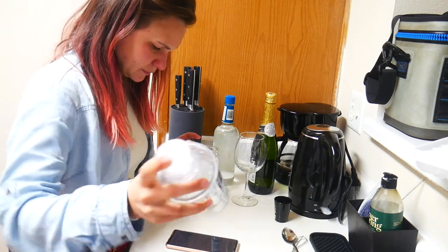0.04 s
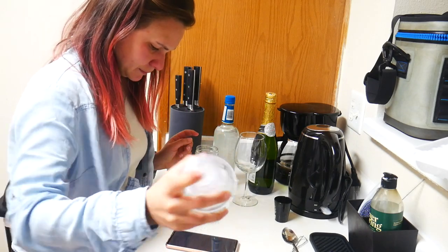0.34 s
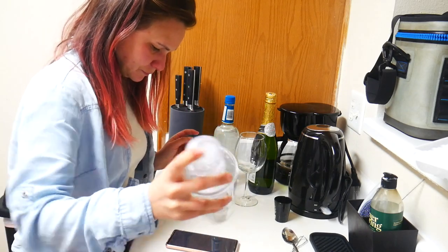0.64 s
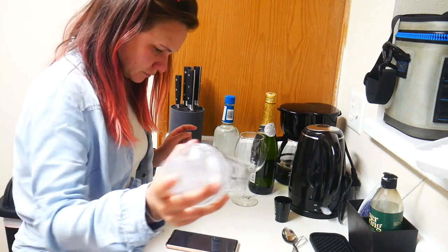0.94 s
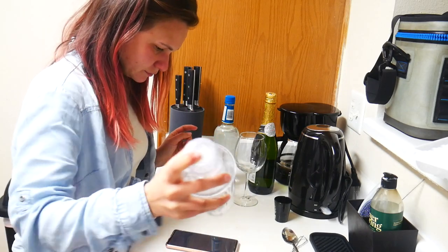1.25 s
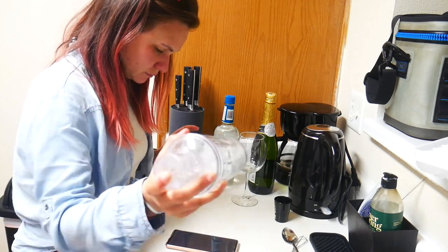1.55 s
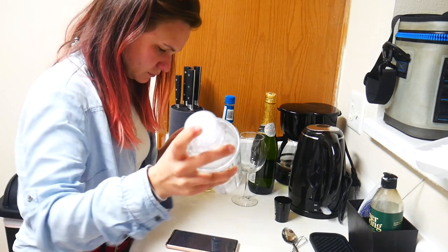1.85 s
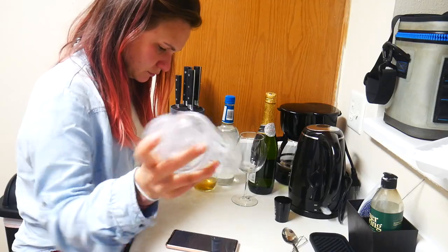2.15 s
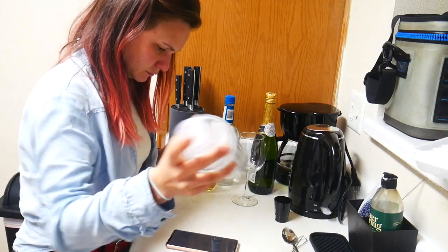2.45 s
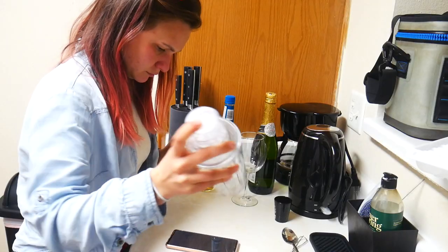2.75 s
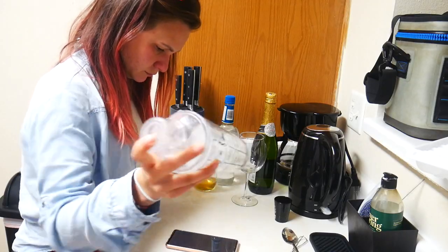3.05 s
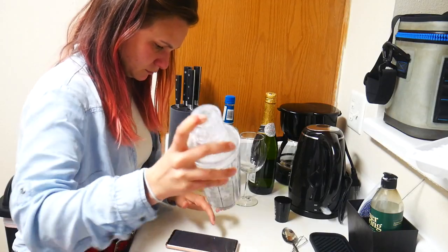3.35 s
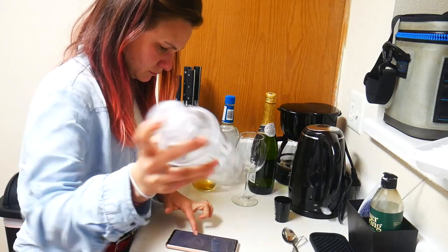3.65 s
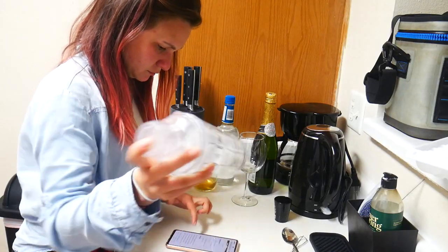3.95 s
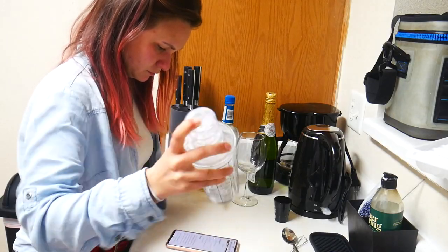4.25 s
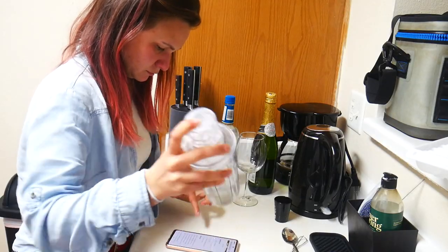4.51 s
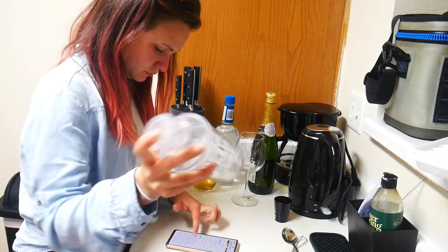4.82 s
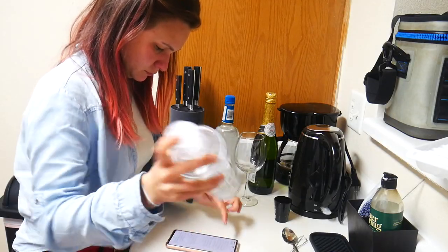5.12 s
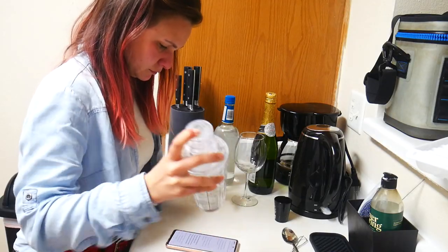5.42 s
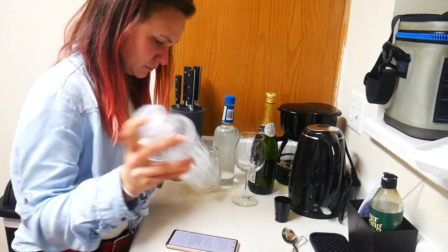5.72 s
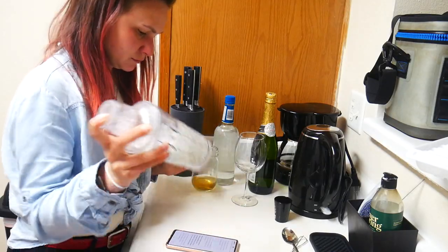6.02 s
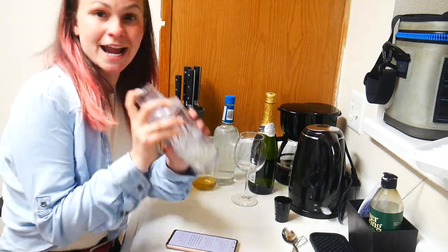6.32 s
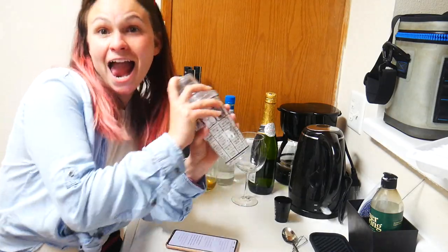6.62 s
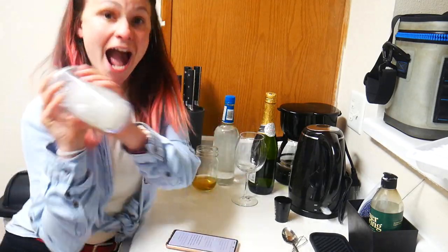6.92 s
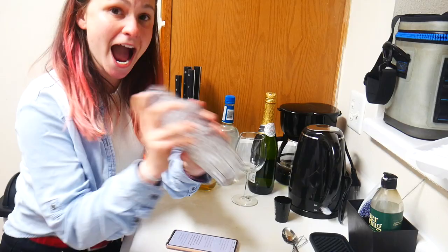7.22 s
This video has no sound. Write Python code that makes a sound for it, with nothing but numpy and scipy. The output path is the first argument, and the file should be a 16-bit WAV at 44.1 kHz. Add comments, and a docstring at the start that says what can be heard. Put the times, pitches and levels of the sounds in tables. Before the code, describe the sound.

Ice and liquid are shaken hard in a metal cocktail shaker, a fast, even rattle that loosens near the end.

```python
"""Ice and liquid are shaken hard in a metal cocktail shaker in a small kitchen, about 4.6 strokes a second.
The first strokes land heavily, until froth builds up. Each slams the load into one end and spills it back
more softly: collisions, clinks and bubbles excite the shaker's resonances, with single cubes standing out.
The shaker keeps moving, so successive blows meet different echoes. After about six seconds the rhythm
breaks into a loose rattle and some slower swings."""
import sys
import numpy as np
from scipy import signal
from scipy.fft import rfft, irfft
from scipy.io import wavfile

SR = 44100
rng = np.random.default_rng(int(sys.argv[2]) if len(sys.argv) > 2 else 0)


def wav_record(signal):
    """Record a signal, one row per channel, as 16-bit PCM in the file named by sys.argv[1]."""
    frames = np.transpose(np.atleast_2d(signal))
    bounded = np.clip(frames, -1, 1)
    # unit amplitude maps onto the largest positive 16-bit level
    quanta = np.round(bounded * 32767).astype(np.int16)
    wavfile.write(sys.argv[1], SR, quanta)


N = 325008
SIZE = 8192   # samples in one blow or impulse response
HZ = np.maximum(np.arange(SIZE // 2 + 1) * SR / SIZE, 1)
AGE = np.arange(SIZE) / SR   # seconds since a blow began


def from_db(db):
    """Amplitude ratio of a level in decibels."""
    return 10 ** (np.asarray(db) / 20)


def unit(x):
    """Normalisation to an energy of one."""
    return x / np.sqrt(np.sum(x ** 2) + 1e-20)


def at_hz(points):
    """Interpolation of a table on a log-frequency axis."""
    hz, value = np.transpose(points)
    return np.interp(np.log(HZ), np.log(hz), value)


def through(x, curve_db):
    """Minimum-phase filtering: folding the cepstrum makes a gain curve causal."""
    cepstrum = irfft(np.log(from_db(curve_db)))
    cepstrum[1:SIZE // 2] *= 2
    cepstrum[SIZE // 2 + 1:] = 0
    response = irfft(np.exp(rfft(cepstrum)))
    return signal.fftconvolve(x, response)[:len(x)]


def add(track, start_s, sound):
    """Superposition of a sound on a track."""
    start = max(0, round(start_s * SR))
    track[start:start + len(sound)] += sound[:N - start]


def collisions(per_s, spread_db, size):
    """Poisson process: random clicks of either sign, many small and a few large."""
    heights = from_db(spread_db * np.minimum(rng.exponential(1, size), 3.5))
    hits = rng.random(size) < per_s / SR
    return hits * heights * rng.choice([-1, 1], size)


def tilt(bass_db, treble_db, bass_edge_hz=1040, treble_edge_hz=4500):
    """Contact hardness, as a dB curve: cushioned blows carry bass, bare ice splinters in the treble."""
    bass_shelf = 1 / (1 + (HZ / bass_edge_hz) ** 4)
    treble_slope = .62 * np.sqrt(np.log(1 + (HZ / treble_edge_hz) ** 4))
    return bass_db * bass_shelf + treble_db * treble_slope


# Spectrum of the steady background: frequency_hz, relative_level_db
ROOM_SPECTRUM = [(25, 10), (120, 3), (400, -2), (2000, -30), (15000, -40)]

def room_tone(level_db=-77):
    """Stationary noise: a faint rumble, uncorrelated between left and right."""
    rumble = [unit(through(noise, at_hz(ROOM_SPECTRUM))) for noise in rng.standard_normal((2, N))]
    return from_db(level_db) * np.sqrt(N) * np.array(rumble)


# Reverberation time of the kitchen: frequency_hz, t60_s
KITCHEN_DECAY = [(150, 0.44), (500, 0.2), (1200, 0.52), (3000, 0.31), (7000, 0.39), (15000, 0.2)]

def echoes(early_db, tail_db, build_s=0.0041, count=10):
    """Room impulse response: reflections off counter, wall and cupboards, then a diffuse tail."""
    early = np.zeros(SIZE)
    early[(rng.uniform(.001, .012, count) * SR).astype(int)] = rng.standard_normal(count)
    spectrum, tail = rfft(rng.standard_normal(SIZE)), 0
    centres_hz, t60s = np.transpose(KITCHEN_DECAY)
    for band, t60_s in zip(np.eye(len(t60s)), t60s):
        band_noise = irfft(spectrum * np.interp(np.log(HZ), np.log(centres_hz), band))
        tail = tail + band_noise * from_db(-60 * AGE / t60_s)
    build_up = 1 - np.exp(-AGE / build_s)
    return from_db(early_db) * unit(early) + from_db(tail_db) * unit(tail * build_up)


def kitchen(blows, positions=40):
    """Reflections depend on source position: each (start_s, sound) takes the next set of echoes."""
    responses = [(echoes(early_db=-11, tail_db=-7), echoes(early_db=-4, tail_db=-4))
                 for _ in range(positions)]
    direct, ahead, around = np.zeros((3, N))
    for k, (start_s, sound) in enumerate(blows):
        add(direct, start_s, sound)
        for track, response in zip((ahead, around), responses[k % positions]):
            add(track, start_s, signal.fftconvolve(sound, response))
    return direct, ahead, around


# Stereo width by frequency: frequency_hz, side_gain_db
STEREO_WIDTH = [(60, -1), (200, -11), (700, -10), (2700, -10.5), (4000, -21), (6800, -22), (8500, -7.5),
                (15000, -6.5)]

def stereo_width(sound):
    """Side-channel gain sets the stereo width: nearly mono from 4 to 7 kHz."""
    return through(sound, at_hz(STEREO_WIDTH))


# Radiation of the filled shaker: frequency_hz, relative_level_db
RADIATION = [(30, -34), (90, -29), (140, -13.5), (330, -7), (520, -5), (1100, -1.32), (2400, 0.2),
             (4000, -2), (5100, -5), (7400, -6), (8400, -8.5), (10500, -9), (13000, -15), (16000, -28)]
# Resonances of the cavity and wall: centre_hz, width_hz, lift_db
SHAKER_MODES = [(152.5, 21, 3), (239, 20, 4.5), (506, 220, 4), (634, 73, 3.5), (892, 150, 4.5),
                (1150, 95, 2.5), (1363, 18, 7.5), (1541, 47, 3.5), (2830, 196, 4), (3490, 84, 3.5),
                (5780, 710, 2.5), (9830, 1600, 2)]

def shaker_body():
    """Modal response, as a dB curve: Lorentzian peaks on a broad radiation spectrum."""
    peaks_db = sum(lift_db / (1 + (2 * (HZ - centre_hz) / width_hz) ** 2)
                   for centre_hz, width_hz, lift_db in SHAKER_MODES)
    return at_hz(RADIATION) + peaks_db


# Loose ice and liquid between the surges: time_s, level_db
SWILL_LEVELS = [(0, -29.5), (1.2, -37), (6.0, -38.5), (6.4, -42), (6.95, -42), (7.1, -30.5), (7.37, -35.5)]

def swill(body):
    """Shot noise: dense, tiny impacts of loose cubes and froth in mid-flight merge into a rustle."""
    ticks = collisions(per_s=5000, spread_db=1.5, size=N)
    rustle = through(ticks, body + tilt(bass_db=-2, treble_db=-5))
    level_db = np.interp(np.arange(N) / SR, *np.transpose(SWILL_LEVELS))
    return np.sqrt(N) * unit(rustle) * from_db(level_db)


def chips(direct, body, share_db=-5.5, settle_s=0.016):
    """Relaxation: each blow scatters chips and froth, which crackle on as its energy leaks away."""
    retained = np.exp(-1 / (settle_s * SR))
    agitation = signal.lfilter([1 - retained], [1, -retained], direct ** 2 + 1e-18)
    ticks = collisions(per_s=5000, spread_db=4, size=N)
    crackle = through(ticks, body + tilt(bass_db=-2.5, treble_db=-2.5))
    return from_db(share_db) * np.sqrt(N * agitation) * unit(crackle)


def clack(pitch_hz, lift_db, ripple_db, width_octaves=.14, points=50):
    """Selective excitation, as a dB curve: one resonance stands out, the load damps others at random."""
    ripple = np.transpose([np.geomspace(150, 16000, points), rng.normal(0, ripple_db, points)])
    peak = np.exp(-.5 * (np.log2(HZ / pitch_hz) / width_octaves) ** 2)
    return lift_db * peak + at_hz(ripple)


def clatter(lift_db, centre_hz=2400, width_octaves=0.98):
    """Band emphasis, as a dB curve: the more ice lands ahead of the liquid, the stronger the middle."""
    return lift_db / (1 + (np.log2(HZ / centre_hz) / width_octaves) ** 4)


def fresh_bass(start_s, lift_db=2, froth_s=0.27):
    """Cushioning: fresh liquid lands with extra bass, in dB, which dies away as froth builds up."""
    return lift_db * np.exp(-start_s / froth_s)


def rings(starts, low_hz, high_hz, cycles, glide, size=2048):
    """Damped oscillators of random pitch: over `cycles` they fall 60 dB and rise by the fraction `glide`."""
    out, age = np.zeros(SIZE + size), AGE[:size]
    for start in starts:
        pitch_hz = low_hz * (high_hz / low_hz) ** rng.random()
        life = age * pitch_hz / cycles
        phase = 2 * np.pi * pitch_hz * age * (1 + glide * life / 2)
        out[start:start + size] += rng.normal() * from_db(-60 * life) * np.cos(phase)
    return unit(out[:SIZE])


def push(rise_s, fall_s, first_touch=0):
    """Contact force of the load: a share arrives at once, the rest piles up, then it settles."""
    piled = np.minimum(AGE / max(rise_s, 1 / SR), 1)
    settling = np.exp(-np.maximum(AGE - rise_s, 0) / fall_s)
    return (first_touch + (1 - first_touch) * piled) * settling


def surge(force, body, low_hz, high_hz, clack_db, spread_db):
    """Common excitation: one force drives crackling ice, clinking cubes and ringing air bubbles."""
    clink_starts, bubble_starts = rng.choice(SIZE, (2, 12), p=force ** 2 / np.sum(force ** 2))
    clack_hz = low_hz * (high_hz / low_hz) ** rng.random()
    impacts = force * collisions(per_s=3600, spread_db=spread_db, size=SIZE)
    crackle = through(impacts, body + clack(clack_hz, clack_db, ripple_db=1.5))
    clinks = from_db(-12) * rings(clink_starts, low_hz=1190, high_hz=4180, cycles=41, glide=0)
    bubbles = from_db(-17) * rings(bubble_starts, low_hz=466, high_hz=1480, cycles=14.5, glide=0.09)
    return np.linalg.norm(force) * unit(unit(crackle) + clinks + bubbles)


def cube(body, clack_hz, clack_db, crunch_db=5, crunch_s=0.0013):
    """Brittle impact: one impulse and a brief crunch as the cube's edge crumbles."""
    contact = from_db(crunch_db) * unit(rng.standard_normal(SIZE) * np.exp(-AGE / crunch_s))
    contact[0] += rng.choice([-1, 1])
    return unit(through(contact, body + clack(clack_hz, clack_db, ripple_db=1.8)))


# Single cubes hitting the wall or cap: start_s, level_db, bass_db, treble_db, pitch_hz
CUBE_KNOCKS = [(0.145, -18, 7, 13, 3460), (0.151, -6.5, 6, -7, 3460), (0.327, -12, -2, -9, 2500),
               (0.355, -6.5, -11, -1, 3400), (0.359, -8.0, 8, -2, 3450), (0.568, -9, 0, -7, 3260),
               (0.584, -11.5, 12, -8, 550), (0.666, -17.5, 3, 1, 2780), (0.784, -10, 11, -18, 780),
               (0.791, -3.5, 4.5, -14, 814), (0.887, -12, 7, -1, 1620), (0.99, -7, -4, 0, 3340),
               (0.995, -14.0, 11.5, -2, 3310), (1.085, -5.5, -3, -7, 2740), (1.28, -7, -8, -11, 2220),
               (1.297, -10.5, -13, 2, 2240), (1.406, -20.5, 16.5, 14.5, 940), (1.612, -13, 5, 3, 810),
               (1.706, -12, -9, 7.5, 3670), (1.819, -20.5, 12, 12, 2770), (2.036, -25, 16, 18, 500),
               (2.056, -12, -6, 1, 1650), (2.244, -7, 1.5, -6, 3440), (2.343, -15, 0, -1, 1480),
               (2.461, -7.5, -3.5, -7, 3620), (2.673, -10, 3, -4, 3460), (2.75, -11.0, -6, 2, 4190),
               (2.878, -15.5, -11, -8, 3040), (2.902, -13, 8, 4, 1010), (3.312, -19.5, 11.5, 11, 550),
               (3.406, -16, -3, 10, 1770), (3.517, -17.5, -11.5, -8, 1210), (3.55, -19.5, 2, 10, 1840),
               (3.555, -13, -9.5, -2, 3540), (3.567, -9.5, -19, -11, 1660), (3.775, -8, 4, 1, 790),
               (4.082, -9, -7, -5, 1670), (4.21, -11.5, 10, -12, 3280), (4.302, -16, -2, 1, 1530),
               (4.67, -8.5, 5.5, 0, 3100), (4.772, -5.5, -7, -6, 2320), (4.777, -9.5, -6.5, 3, 2380),
               (4.915, -25, 0, 17.5, 3360), (5.008, -13.5, 0, -3, 1540), (5.164, -11, 0, -1, 1160),
               (5.242, -12.5, 7, 0, 1280), (5.378, -20, 0.5, 13, 1230), (5.475, -9, 0, -4, 2320),
               (5.598, -20, 6, 6, 1270), (5.698, -7, -7.5, -8, 2740), (5.909, -12, -4, -8, 2620),
               (5.934, -11, -2, -16, 2810), (6.054, -16.5, -9, 6.5, 1220), (6.085, -9, -9, -9, 2890),
               (6.297, -17.5, 1.5, -14, 1710), (6.338, -22, 0, -19, 2300), (6.366, -21.5, 1, -22, 2300),
               (6.442, -7, -6.5, -3.5, 2450), (6.624, -17, 11, 2, 2540), (6.702, -6, -8, -5, 2070),
               (6.853, -7, -16, -14, 2150), (6.981, -8.5, 2.5, -6, 1410), (6.995, -11.5, -2, -6, 3900)]

def knocks(body, gain_db=0.68, ring_db=9.5, loss_per_bass_db=0.44):
    """Liquid damping: a bare cube rings on the metal; one with liquid behind it gives a heavy knock."""
    millisecond_scale = np.sqrt(SR / 1000)   # unit energy becomes unit power over one millisecond
    for start_s, level_db, bass_db, treble_db, pitch_hz in CUBE_KNOCKS:
        contact = cube(body, pitch_hz, clack_db=ring_db - loss_per_bass_db * bass_db)
        knock = through(contact, tilt(bass_db, treble_db))
        yield start_s, from_db(level_db + gain_db) * millisecond_scale * knock


# The load tumbling once the rhythm breaks: start_s, rise_s, level_db, clatter_db
LOOSE_TUMBLES = [(6.148, 0.049, -20.5, -1), (6.426, 0.021, -22, 0.5), (6.476, 0.014, -17.5, -5),
                 (6.515, 0.019, -24, 0.5), (6.558, 0.037, -22.5, -1.5), (6.616, 0.0037, -17.5, -1),
                 (6.668, 0.0031, -22, -1.5), (6.7, 0.0008, -22.0, 1), (6.743, 0.043, -21, -0.5),
                 (6.823, 0.038, -25, 3.5), (7.148, 0.047, -17, 1.5), (7.272, 0.024, -25.5, 5.5)]

def tumbles(body, gain_db=0.44):
    """Wall resonance: without a hard swing the cubes drop on the side, which answers near one pitch."""
    for start_s, rise_s, level_db, clatter_db in LOOSE_TUMBLES:
        force = push(rise_s, fall_s=0.021)
        rattle = surge(force, body, low_hz=1880, high_hz=2380, clack_db=5, spread_db=4)
        colour = tilt(bass_db=-2, treble_db=-1.6) + clatter(clatter_db)
        yield start_s, from_db(level_db + gain_db) * through(rattle, colour)


# The load spilling back between slams: start_s, rise_s, level_db, clatter_db
RETURN_SPILLS = [(0.203, 0.037, -19, 3.5), (0.428, 0.029, -17.5, -1.5), (0.638, 0.015, -14.5, -2.5),
                 (0.858, 0.027, -17.5, -0.5), (1.067, 0.012, -21, 4.5), (1.258, 0.039, -19, -3),
                 (1.482, 0.016, -15.5, -0.5), (1.696, 0.012, -23.5, 7), (1.899, 0.019, -17, -1),
                 (2.085, 0.051, -20.5, 2.5), (2.298, 0.05, -19, 0), (2.526, 0.04, -21.5, 1.5),
                 (2.736, 0.039, -19.0, -1), (2.943, 0.049, -18.5, 0), (3.17, 0.028, -18.5, 1.5),
                 (3.396, 0.018, -18, 0.5), (3.617, 0.032, -17, 1), (3.862, 0.013, -18, -1),
                 (4.078, 0.0068, -14, -2), (4.285, 0.027, -18.0, -1), (4.504, 0.041, -18.5, -1),
                 (4.757, 0.017, -26.5, 5), (4.998, 0.0097, -16.5, -1), (5.193, 0.046, -23, 3),
                 (5.454, 0.022, -22, -1), (5.684, 0.027, -15.5, -6), (5.887, 0.054, -24, 2)]

def spills(body, gain_db=0.24):
    """Gradual loading: on the way back the force swells from zero, with less bass and treble."""
    for start_s, rise_s, level_db, clatter_db in RETURN_SPILLS:
        force = push(rise_s, fall_s=0.023)
        splash = surge(force, body, low_hz=985, high_hz=1820, clack_db=1, spread_db=3.5)
        colour = tilt(bass_db=-4 + fresh_bass(start_s), treble_db=-0.7) + clatter(clatter_db)
        yield start_s, from_db(level_db + gain_db) * through(splash, colour)


# The load slamming into the far end: start_s, rise_s, level_db, clatter_db
SLAM_STROKES = [(0, 0.023, -18.5, 1.5), (0.138, 0.014, -20, 2), (0.353, 0.0019, -17.5, -2),
                (0.567, 0.016, -16, -3.5), (0.775, 0.03, -19, -4), (0.988, 0.001, -17.5, -1.5),
                (1.181, 0.025, -18, 1), (1.392, 0.036, -19, -0.5), (1.607, 0.005, -15.5, -4),
                (1.818, 0.002, -15.5, -6), (2.033, 0.026, -21, 1.5), (2.243, 0.0028, -17.5, 0.5),
                (2.459, 0.011, -18, 1), (2.671, 0.01, -19.5, 2.5), (2.898, 0.016, -21, 1),
                (3.095, 0.034, -21.5, 1.5), (3.297, 0.036, -22, -1.5), (3.545, 0.027, -24.5, 4),
                (3.764, 0.012, -19.5, 1.5), (3.988, 0.017, -22.5, 4), (4.205, 0.022, -21.5, 4),
                (4.438, 0.024, -21.5, 6.5), (4.664, 0.011, -18, -0.5), (4.906, 0.014, -18.5, -2),
                (5.162, 0.008, -19.5, -3.5), (5.376, 0.009, -16.5, -3), (5.596, 0.026, -18, 0.5),
                (5.829, 0.029, -21.5, -1), (6.047, 0.045, -23, 0.5), (6.98, 0.013, -17, 1)]

def thuds(band_hz=(25, 85), swell_s=0.0039, gain_db=-34.5, tiring_db_per_s=0.5):
    """Momentum transfer: slams jolt the shaker, less as the arm tires; the hand cushions each to a bump."""
    out = np.zeros(N)
    cushion = signal.butter(2, band_hz, "band", fs=SR, output="sos")
    for start_s, rise_s, level_db, _ in SLAM_STROKES:
        jolt = rng.standard_normal(SIZE) * AGE * np.exp(-AGE / swell_s)
        bump = signal.sosfilt(cushion, jolt)
        peak = from_db(level_db + gain_db - tiring_db_per_s * start_s)
        add(out, start_s + rise_s / 2, peak * bump / np.abs(bump).max())
    return out


def slams(body, gain_db=0.1, wash_db=-10):
    """Sudden loading: a bright crash with a hollow knock in it, then a duller wash along the wall."""
    for start_s, rise_s, level_db, clatter_db in SLAM_STROKES:
        crash_force = push(rise_s, fall_s=0.014, first_touch=0.33)
        crash = surge(crash_force, body, low_hz=450, high_hz=1350, clack_db=4, spread_db=4)
        crash = through(crash, clatter(clatter_db))
        wash_force = push(rise_s, fall_s=0.11, first_touch=0.1)
        wash = surge(wash_force, body, low_hz=1000, high_hz=1760, clack_db=5.5, spread_db=3)
        wash = from_db(wash_db) * through(wash, tilt(bass_db=-0.5, treble_db=-2))
        colour = tilt(bass_db=-1.1 + fresh_bass(start_s), treble_db=3)
        yield start_s, from_db(level_db + gain_db) * through(crash + wash, colour)


def scene():
    """Mid-side stereo: the shaker is almost straight ahead; an uncorrelated side channel gives width."""
    body = shaker_body()
    direct, ahead, around = kitchen([*slams(body), *spills(body), *tumbles(body), *knocks(body)])
    mid = direct + ahead + chips(direct, body) + swill(body) + thuds()
    side = stereo_width(around + chips(direct, body) + swill(body) + thuds())
    balance = from_db([[.15], [-.1]])
    return balance * np.array([mid + side, mid - side]) + room_tone()


def record(dry, notch_hz=7850, ceiling=.92, cutoff_hz=15400):
    """Microphone response: a narrow notch and a steep low-pass; before the low-pass, the highest peaks are
    softly rounded."""
    notched = signal.lfilter(*signal.iirnotch(notch_hz, Q=45, fs=SR), dry)
    rounded = notched / (1 + (notched / ceiling) ** 8) ** (1 / 8)
    low_pass = signal.ellip(10, .2, 80, cutoff_hz, fs=SR, output="sos")
    return signal.sosfilt(low_pass, rounded)


dry = scene()
out = record(dry)
wav_record(out)
```